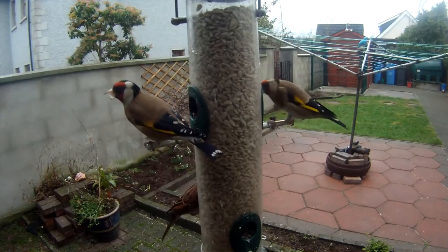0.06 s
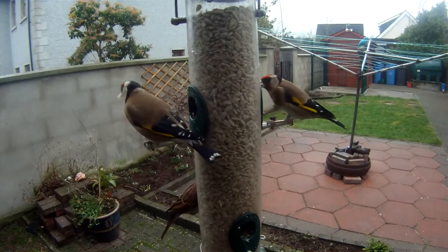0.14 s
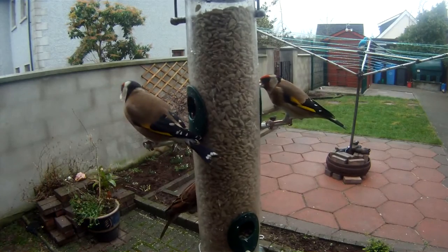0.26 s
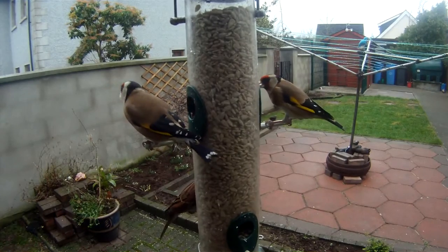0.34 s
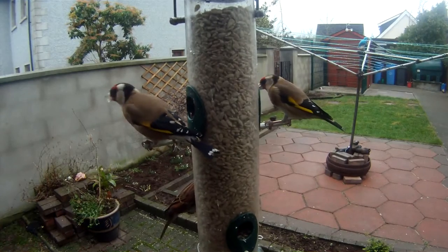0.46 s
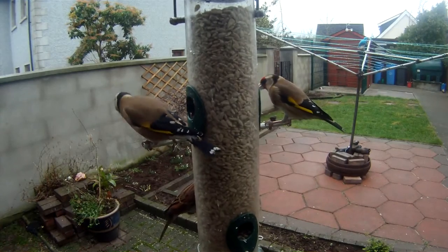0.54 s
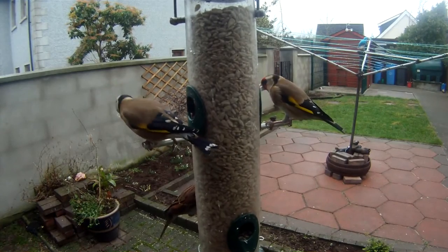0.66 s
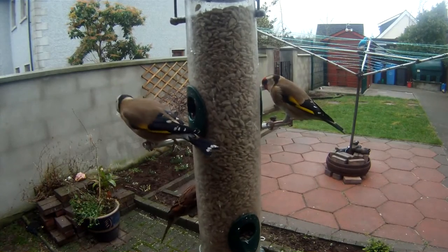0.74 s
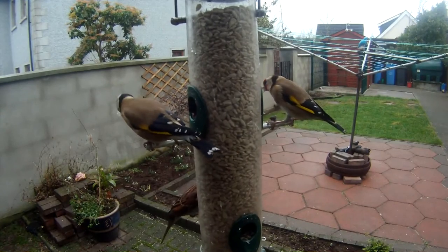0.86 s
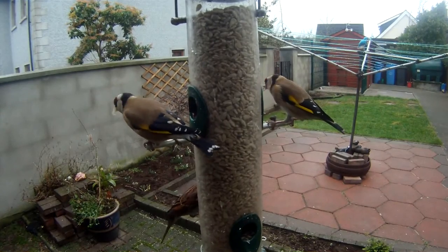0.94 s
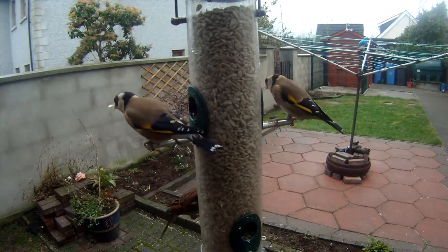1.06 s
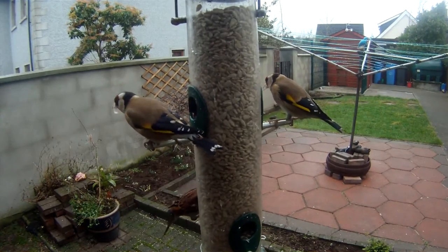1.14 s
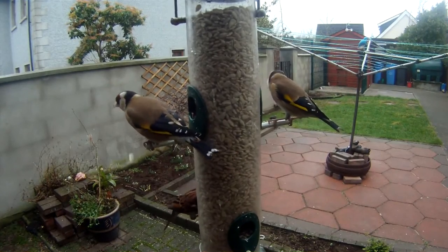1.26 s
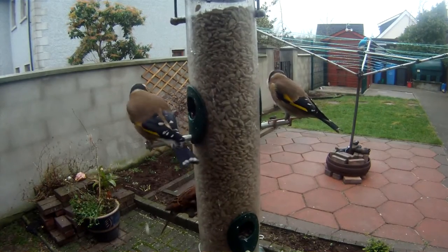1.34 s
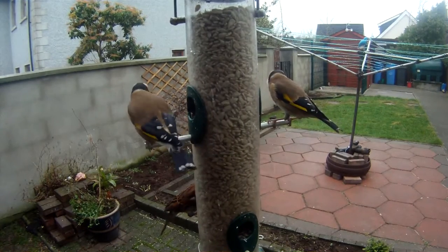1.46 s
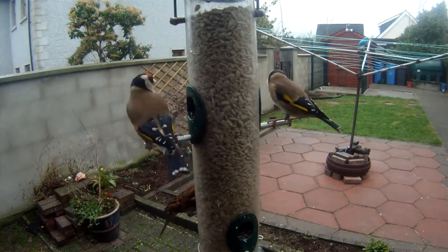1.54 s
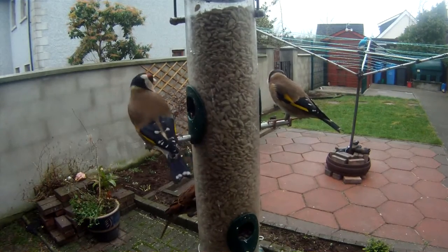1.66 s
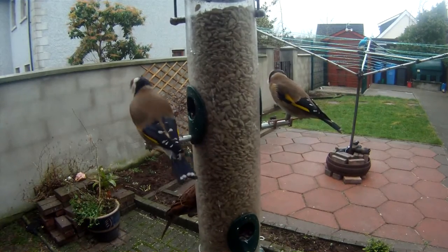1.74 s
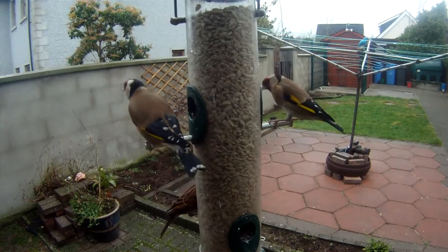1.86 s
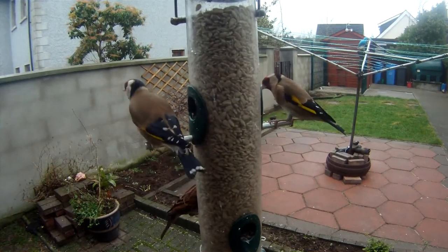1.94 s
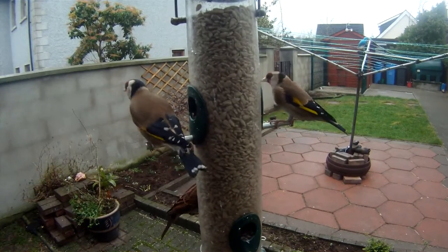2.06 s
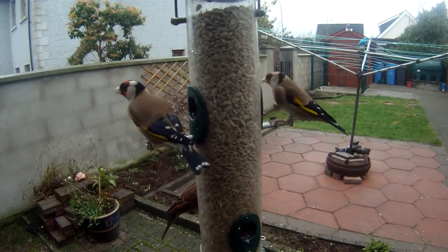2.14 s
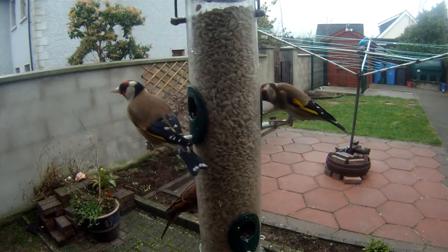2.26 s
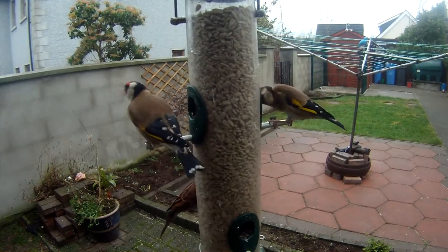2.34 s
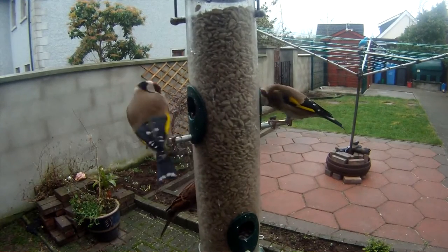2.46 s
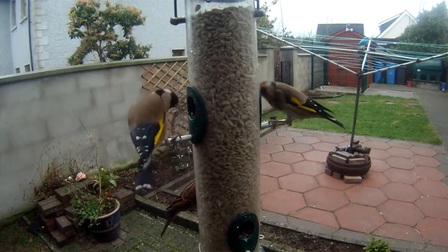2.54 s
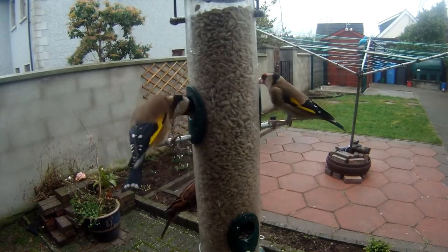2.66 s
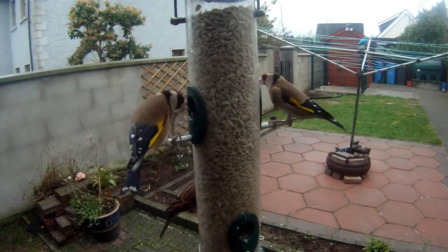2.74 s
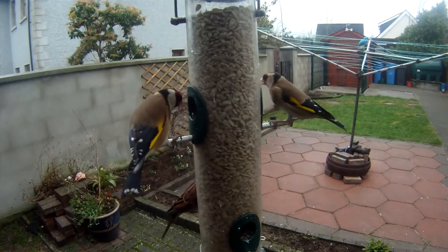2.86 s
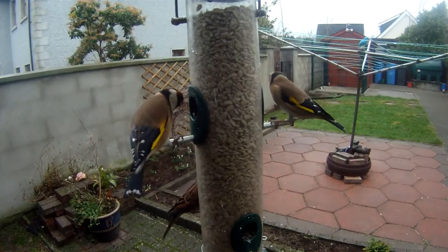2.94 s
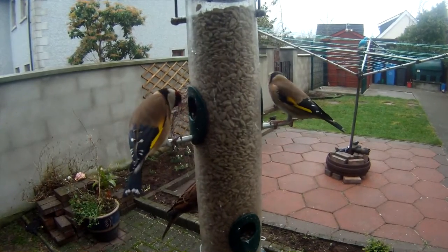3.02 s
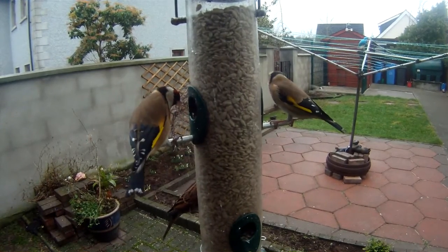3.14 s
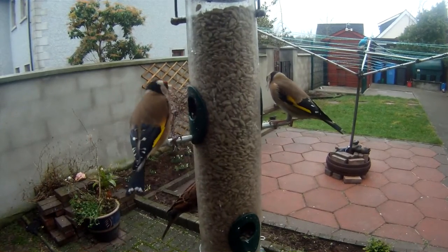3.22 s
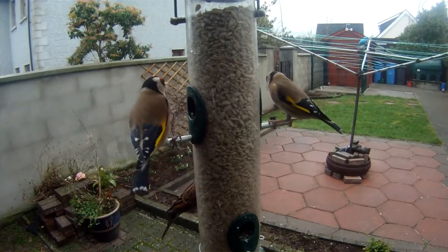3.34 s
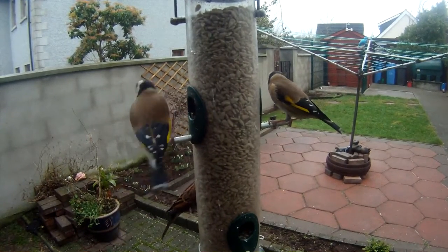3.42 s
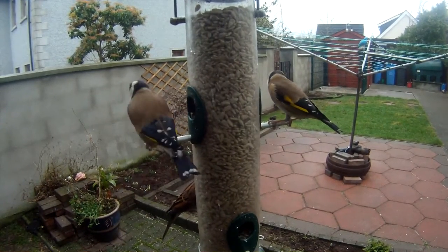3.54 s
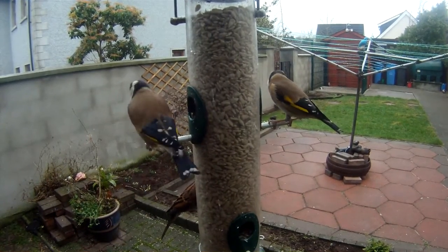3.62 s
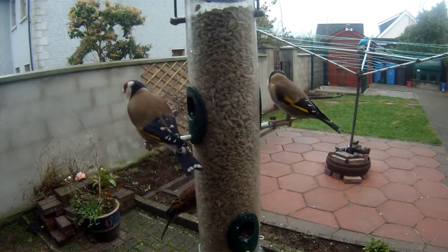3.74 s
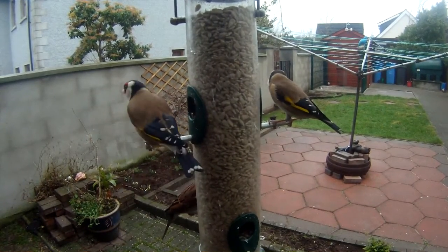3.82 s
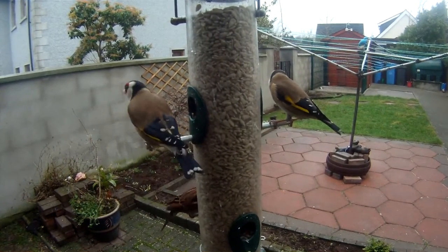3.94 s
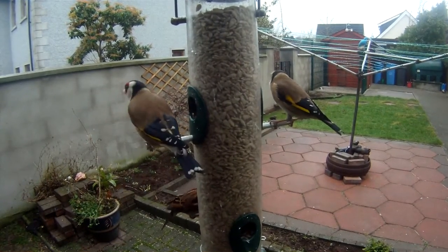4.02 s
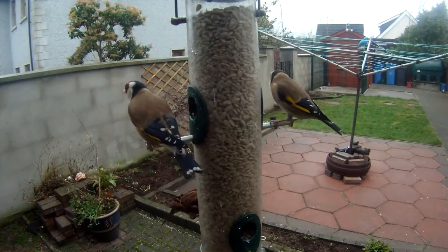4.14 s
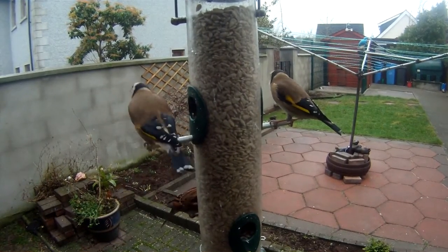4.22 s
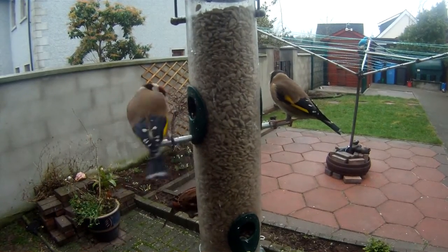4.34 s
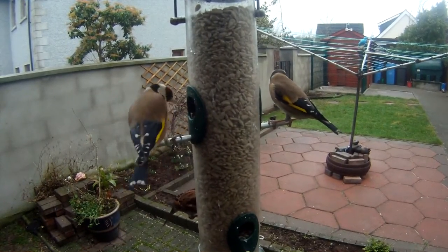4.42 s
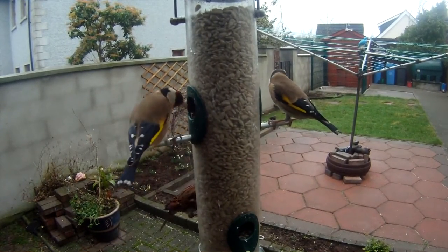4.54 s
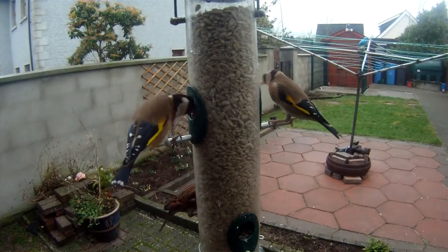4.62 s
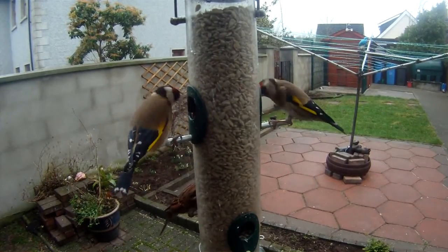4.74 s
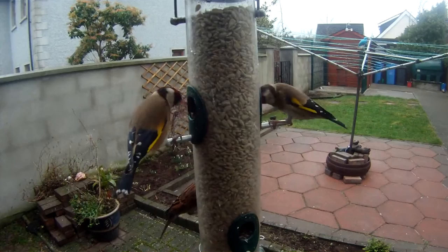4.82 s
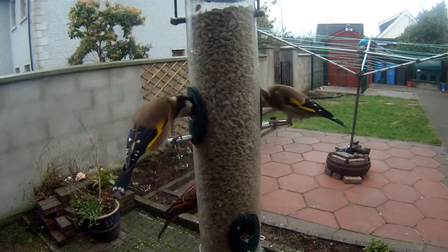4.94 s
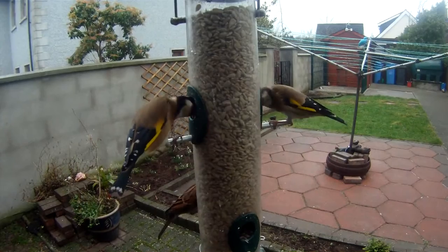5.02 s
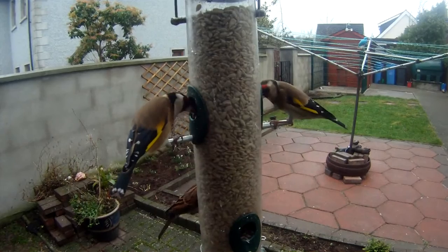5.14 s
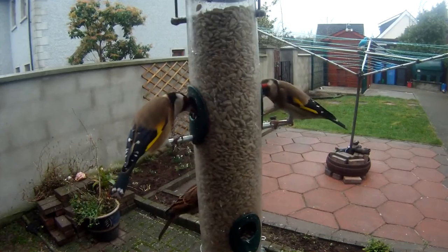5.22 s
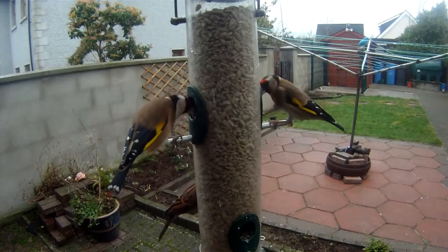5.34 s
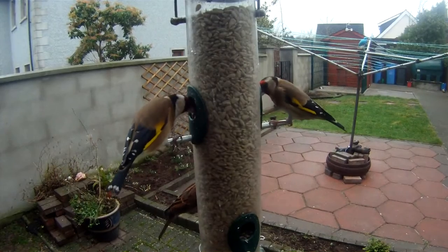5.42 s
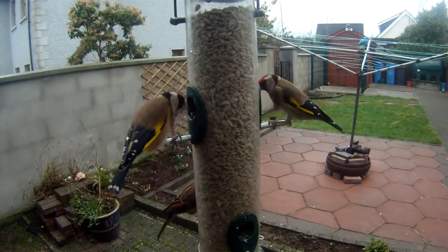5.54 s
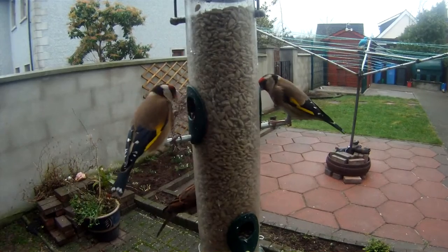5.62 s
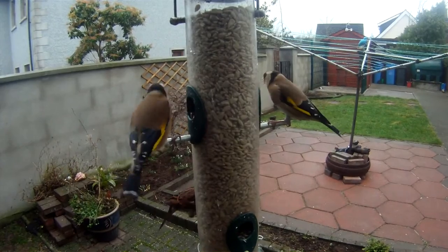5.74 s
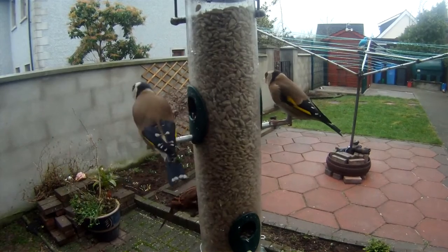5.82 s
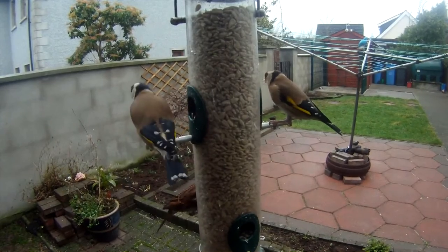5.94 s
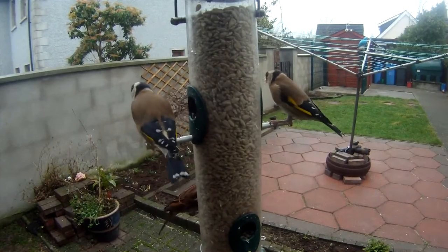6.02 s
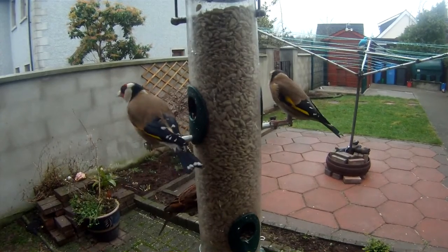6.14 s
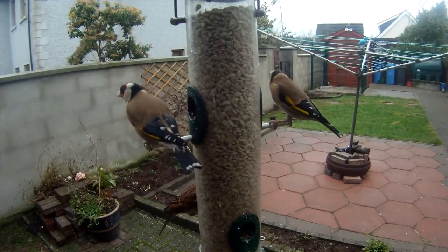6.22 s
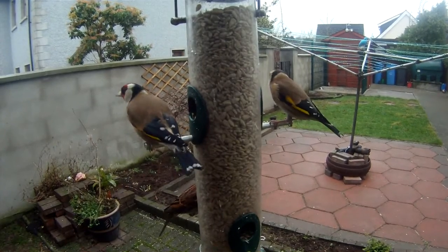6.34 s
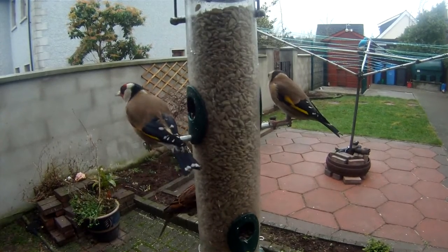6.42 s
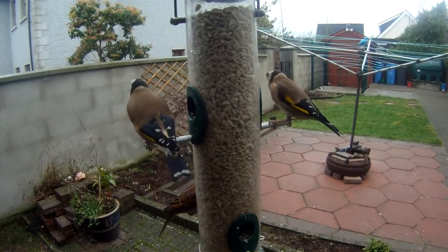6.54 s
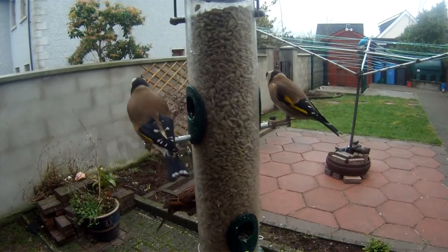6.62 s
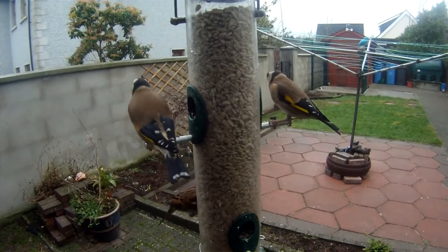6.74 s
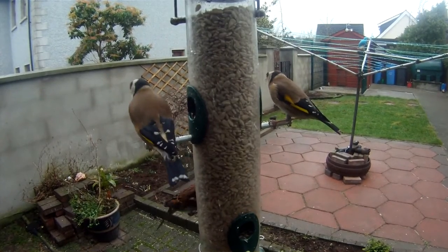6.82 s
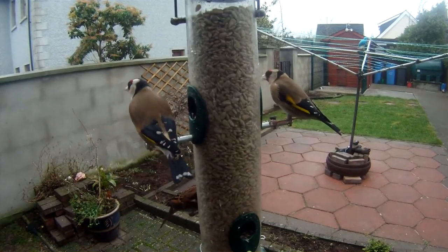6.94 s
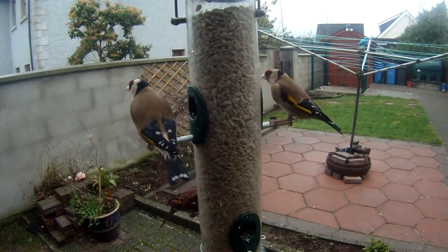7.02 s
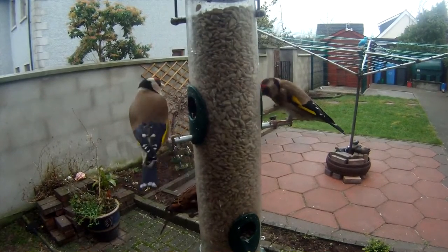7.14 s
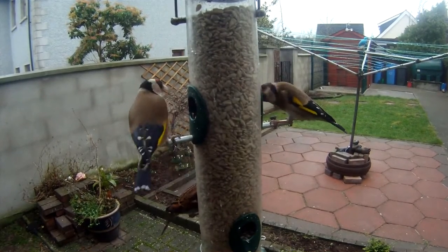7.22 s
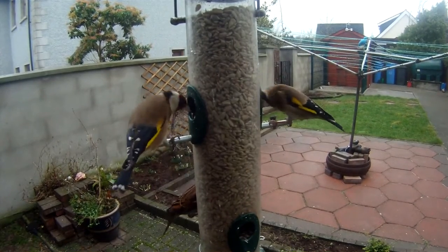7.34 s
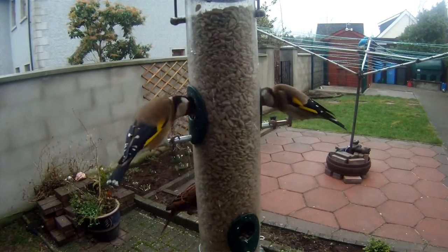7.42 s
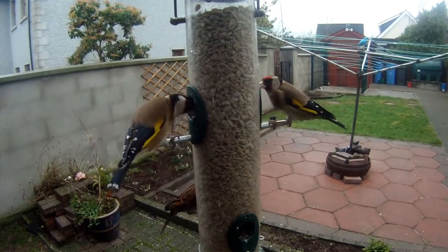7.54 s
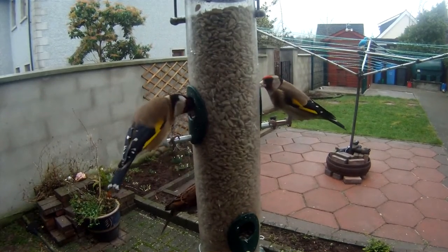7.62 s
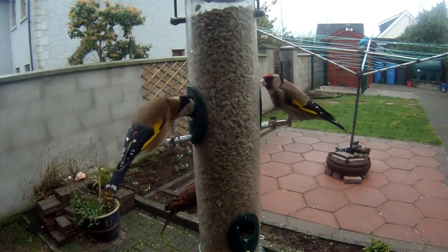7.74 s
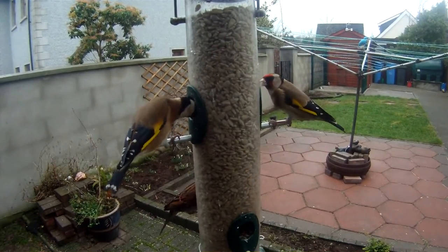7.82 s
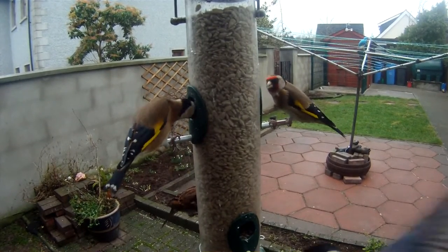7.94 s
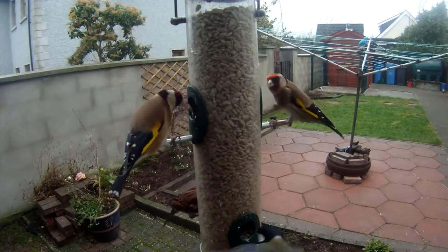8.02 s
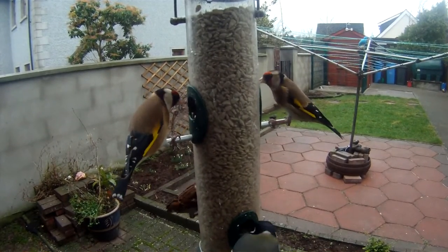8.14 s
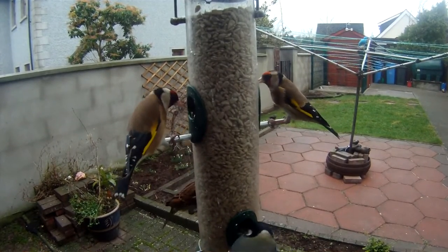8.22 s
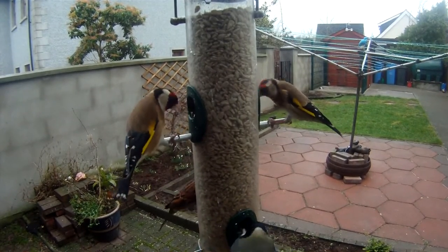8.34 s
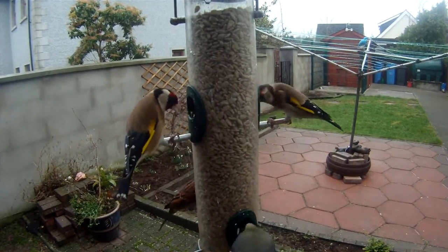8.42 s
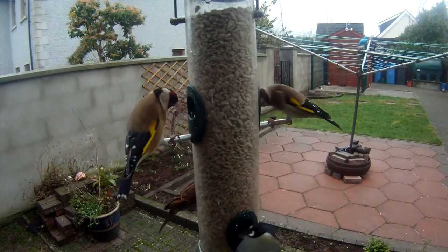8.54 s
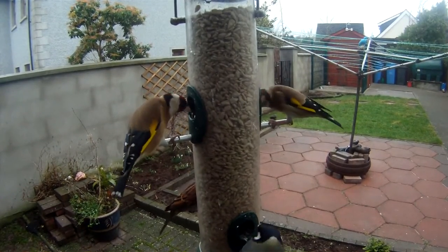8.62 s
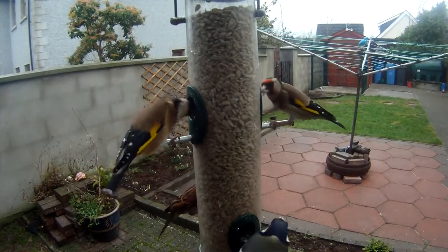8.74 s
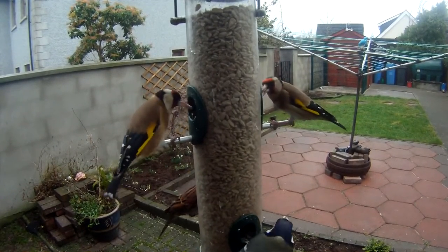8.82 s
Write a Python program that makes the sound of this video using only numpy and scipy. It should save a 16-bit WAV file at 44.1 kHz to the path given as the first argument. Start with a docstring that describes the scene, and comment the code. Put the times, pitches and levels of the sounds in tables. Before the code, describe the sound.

Close, irregular pecks click on a plastic feeder tube in a quiet garden, with soft wing puffs, light bird chips and one landing thump.

```python
"""Goldfinches feed at a plastic seed tube in a quiet garden, close to a small mono camera.
Over a distant town hum, a husk snaps, a far songbird whistles and other birds chip and call.
From 2 s, wings push air at the microphone, claws shuffle and pecks ring the tube, busiest near 7 s.
At 8 s a bird lands: the metal perch pings and the mount thumps. A last few pecks follow.
Throughout, the camera's coarse sampling adds a glassy top."""
import sys
import numpy as np
from scipy import signal
from scipy.fft import rfft, irfft
from scipy.io import wavfile
from scipy.ndimage import uniform_filter1d

SR = 44100
rng = np.random.default_rng(int(sys.argv[2]) if len(sys.argv) > 2 else 0)


def put_to_file(sound):
    """Save the sound as 16-bit audio at rate SR, in the file named by the first command-line argument."""
    columns = np.atleast_2d(sound).T  # one column per channel
    safe = np.clip(columns, -1, 1)
    whole_steps = np.round(safe * 32767)
    wavfile.write(sys.argv[1], SR, whole_steps.astype(np.int16))


N = 391163
TIME_S = np.arange(N) / SR

# Town hum and electronic hiss. Each row: frequency in Hz, relative spectral density in dB.
TOWN_SPECTRUM = [(20, 0.5), (45, 3.5), (90, 3), (170, -3), (350, -4.5), (550, -2), (800, -9.5),
                 (1400, -14.5), (2100, -17.5), (2500, -20), (3200, -23.5), (4000, -25.5), (5200, -27),
                 (6000, -36.5)]
HISS_SPECTRUM = [(100, -21), (200, -15), (900, -12), (3000, -1.5), (5300, 0), (6000, -12.5)]
# Wing beats and gusts. Each row: centre in seconds, half length in seconds, level in dB.
WAFTS = [(2.11, .057, -46.5), (2.7, 0.17, -56), (4.31, .074, -49.5), (5.45, 0.66, -58.5),
         (6.645, 0.048, -40.5), (7.25, .082, -42), (7.68, .054, -45.5), (8.04, 0.0077, -20),
         (8.1, 0.11, -43)]
# Claws and husks scraping. Each row: centre in seconds, half length in seconds, level in dB.
SHUFFLES = [(2.1, 0.068, -66), (4.315, 0.026, -60), (4.51, .045, -61.5), (5.2, 0.081, -62.5),
            (5.84, 0.015, -54), (7.26, 0.03, -62), (6.74, .02, -55), (7.905, 0.033, -56), (8.56, .03, -68)]
# Husks cracking in a beak. Each row: start in seconds, relative level in dB.
HUSK_SNAPS = [(0.162, -60), (2.045, -57), (3.233, -58), (3.601, -60), (4.307, -57), (6.687, -41),
              (6.853, -47.5), (7.198, -55), (7.719, -57.5)]
# Modes of a husk or claw crack, then of the feeder's tube, wall and port.
# Each row: frequency in Hz, bandwidth in Hz, relative gain in dB.
CRACK_MODES = [(1370, 240, -11), (2400, 1600, 1.5), (3270, 520, 9), (4980, 250, 3.5)]
TUBE_MODES = [(326, 63, -6.5), (485, 68, 5.5), (570, 130, 0.5), (790, 40, -16.5)]
WALL_MODES = [(986, 173, -1), (1288, 55, 0.5), (1462, 43, -4), (1665, 140, -3), (1930, 99, 3),
              (2190, 154, -0.5)]
PORT_MODES = [(2830, 240, 9.5), (3187, 160, 14), (3850, 160, 0.5), (4200, 220, -6), (5080, 480, -5.5)]
# Far song. Each row: start in seconds, end in seconds, relative level in dB.
SONG_PHRASES = [(0.173, .86, -66), (4.079, 5.04, -61.5), (8.154, 8.83, -64)]
# Pecks, levels relative. Each row: start in seconds, wall clack in dB, favoured wall pitch in Hz,
# tube thud in dB, port tick in dB, bounce delay in seconds.
PECKS = [(0.272, -59, 2110, -74, -54.5, 0.00206), (2.643, -22.5, 1860, -35.5, -23.5, 0.0071),
         (2.756, -43.5, 1500, -48, -33.5, 0.0021), (2.870, -46.5, 1770, -51, -48, 0.0027),
         (2.897, -43, 1880, -49, -42.5, 0.0018), (4.529, -55, 2100, -62, -38, .002),
         (4.545, -34, 2080, -38.5, -32, 0.0051), (5.254, -32.5, 2170, -50, -28, 0.0091),
         (5.283, -37, 1610, -39, -35, .012), (5.317, -44, 2110, -60, -43.5, 0.0058),
         (6.165, -53.5, 1900, -66, -71, .002), (6.659, -30, 1930, -36.5, -39, 0.0028),
         (6.683, -24.5, 1750, -30, -26.5, 0.0063), (6.711, -33, 1840, -41.5, -34, 0.0048),
         (6.748, -39.5, 1880, -54, -45, 0.0084), (6.847, -22, 1660, -31.5, -28, .009),
         (7.016, -43, 1830, -44.5, -38, .01), (7.041, -45, 1900, -59, -45, 0.0032),
         (7.0674, -20, 1910, -38, -27.5, .011), (7.318, -30, 1480, -39.5, -29, 0.0031),
         (7.371, -49, 1890, -67, -51, 0.0058), (7.559, -36, 1940, -46, -42.5, .002),
         (7.858, -48.5, 1900, -62, -49, .002), (7.881, -40, 1850, -55, -39, 0.0095),
         (7.907, -41, 1860, -58, -54, 0.012), (7.987, -41.5, 1780, -62, -35.5, .002),
         (8.542, -44, 1380, -47.5, -51, 0.0046), (8.586, -39.5, 1840, -58, -42, .002)]
# Contact chips. Each row: start in seconds, middle pitch in Hz, relative level in dB.
CHIPS = [(.444, 3310, -48), (.514, 3440, -47.5), (0.607, 3210, -45), (1.498, 3330, -50.5),
         (2.133, 3010, -45.5), (2.57, 3050, -45.5), (2.659, 3040, -48), (3.114, 3170, -48.5),
         (3.197, 3370, -50.5), (3.738, 3330, -50), (3.829, 3480, -49), (4.826, 3360, -48.5),
         (5.592, 2930, -52), (8.259, 2980, -48)]
# Finch calls, near and far. Each row: start in seconds, relative level in dB.
FINCH_CALLS = [(1.285, -61), (2.669, -45), (7.02, -45)]
# Notes of one call. Each row: delay in seconds, length in seconds, first, middle and last pitch in Hz,
# relative level in dB.
CALL_NOTES = [(0, 0.059, 4250, 4970, 5350, -8.5), (0.042, 0.048, 4290, 4280, 4060, 1),
              (0.083, .035, 4150, 3560, 3100, -4.5)]
# Mount and metal perch. Each row: frequency in Hz, level in dB, time to fall 60 dB in seconds.
MOUNT_MODES = [(41.8, -13, 0.14), (69, -11, 0.099), (241, -24.5, 0.053), (407, -44, 0.072),
               (4860, -29, 0.011)]
# Air pressure on the microphone. Each row: frequency in Hz, relative spectral density in dB.
WAFT_SPECTRUM = [(12, -26), (25, 4.5), (50, 7.0), (100, -10.5), (200, -17), (500, -36.0), (2000, -44)]


def from_db(db):
    """Decibels to gain."""
    return 10 ** (np.asarray(db) / 20)


def unit_rms(x):
    """Scale to rms 1."""
    return x / np.sqrt(np.mean(x ** 2) + 1e-20)


def add(track, start_s, sound):
    """Mix a sound into a track."""
    start = max(0, round(start_s * SR))
    track[start:start + len(sound)] += sound[:N - start]


def noise(spectrum):
    """Steady coloured noise, rms 1."""
    hz, db = np.transpose(spectrum)
    bins_hz = np.maximum(np.fft.rfftfreq(N, 1 / SR), 1)
    colour = from_db(np.interp(np.log(bins_hz), np.log(hz), db)) * bins_hz / np.hypot(bins_hz, 10)
    return unit_rms(irfft(rfft(rng.standard_normal(N)) * colour, N))


def swells(rows):
    """Gain curve: one Gaussian bump per row."""
    return sum(from_db(db) * np.exp(-((TIME_S - centre_s) / half_s) ** 2) for centre_s, half_s, db in rows)


def resonate(force, modes):
    """Parallel resonances, alternating in sign."""
    out = 0
    for k, (hz, width_hz, db) in enumerate(modes):
        r = np.exp(-np.pi * width_hz / SR)
        poles = [1, -2 * r * np.cos(2 * np.pi * hz / SR), r * r]
        out = out + (-1) ** k * from_db(db) * (1 - r * r) / 2 * signal.lfilter([1, 0, -1], poles, force)
    return out


def strike(modes, contact_s, top_hz):
    """A gritty contact rings modes at random strengths; seed rattles on briefly. Peak 3 ms rms is 1."""
    t = TIME_S[:4096]
    attack = np.minimum(4.8 * t / contact_s, 1)
    decay = np.exp(-t / (1.9 * contact_s))
    rattle = 0.013 * np.exp(-t / 0.032)
    force = rng.standard_normal(len(t)) * attack * (decay + rattle)
    ring = resonate(force, [(hz, width_hz, db + rng.normal(0, 2.24)) for hz, width_hz, db in modes])
    band_hz = [0.71 * modes[0][0], top_hz]
    ring = signal.sosfilt(signal.butter(3, band_hz, "band", fs=SR, output="sos"), ring)
    return ring / np.sqrt(uniform_filter1d(ring ** 2, 130).max())


def whistles(notes, wobble):
    """Unsteady sine glides. Each note: start and length in seconds, three pitches in Hz, level in dB."""
    out = np.zeros(N)
    for start_s, length_s, pitches_hz, db in notes:
        progress = np.linspace(0, 1, int(length_s * SR))
        glide_hz = np.polyval(np.polyfit([0, 0.5, 1], pitches_hz, 2), progress)
        jitter = unit_rms(uniform_filter1d(rng.standard_normal(SR // 4), size=60))[:len(progress)]
        phase = 2 * np.pi * np.cumsum(glide_hz * (1 + wobble * jitter)) / SR
        envelope = np.abs(np.sin(np.pi * progress)) ** 0.74
        add(out, start_s, from_db(db) * envelope * np.sin(phase))
    return out


def town_hum(level_db):
    """Distant town and air: steady low noise."""
    return from_db(level_db) * noise(TOWN_SPECTRUM)


def hiss(level_db):
    """Electronic noise, independent per channel."""
    return from_db(level_db) * np.array([noise(HISS_SPECTRUM), noise(HISS_SPECTRUM)])


def breeze_and_wings(breeze_db):
    """A light breeze, gusts and wings press on the microphone port: a lumpy rumble."""
    return (swells(WAFTS) + from_db(breeze_db)) * noise(WAFT_SPECTRUM)


def scraping(slips_per_s, wall_db, nibble_db, trickle_db, delay_s=0.018, half_s=0.015):
    """Tiny slips ring the plastic: steady nibbling, shuffling claws, a seed trickle after each peck."""
    slips = (rng.random(N) < slips_per_s / SR) * rng.standard_normal(N) + 1e-18
    scrape = unit_rms(resonate(slips, PORT_MODES) + from_db(wall_db) * resonate(slips, WALL_MODES))
    trickles = [(peck_s + delay_s, half_s, tick_db + trickle_db) for peck_s, *_, tick_db, _ in PECKS]
    return scrape * (swells(SHUFFLES + trickles) + from_db(nibble_db))


def husk_snaps(gain_db):
    """Husks crack in a beak: small dry snaps."""
    out = np.zeros(N)
    for start_s, db in HUSK_SNAPS:
        add(out, start_s, from_db(db + gain_db) * strike(CRACK_MODES, contact_s=0.0011, top_hz=5460))
    return out


def far_song(pitches_hz, length_s, period_s, detune):
    """A far songbird repeats one sagging whistle in phrases, each note slightly detuned."""
    notes = [(start_s, length_s, np.array(pitches_hz) * rng.normal(1, detune), db)
             for from_s, until_s, db in SONG_PHRASES for start_s in np.arange(from_s, until_s, period_s)]
    return whistles(notes, wobble=0.015)


def garden_echoes(direct, echo_db, t60_s, count=40):
    """Direct sound plus scattered echoes from walls and paving."""
    echoes = np.zeros(N)
    for delay_s in np.linspace(0.008, 0.2, count) + rng.uniform(-0.0015, 0.002053, count):
        add(echoes, delay_s, direct * from_db(echo_db - 60 * delay_s / t60_s) * rng.choice([-1, 1]))
    return direct + echoes


def pecks(wall_db, tube_db, port_db, focus_db_per_octave, contact_s=0.0017):
    """A beak hits, then bounces, duller and deeper. The spot it hits favours some wall modes."""
    out = np.zeros(N)
    for start_s, clack_db, pitch_hz, thud_db, tick_db, bounce_s in PECKS:
        gains = from_db([clack_db + wall_db, thud_db + tube_db, tick_db + port_db])
        touch = (start_s, pitch_hz, gains)
        bounce = (start_s + bounce_s, 0.94 * pitch_hz, gains * from_db([-1, 2.5, -6]))
        for hit_s, favoured_hz, (wall_gain, tube_gain, port_gain) in (touch, bounce):
            wall_modes = [(hz, width_hz, db - focus_db_per_octave * abs(np.log2(hz / favoured_hz)))
                          for hz, width_hz, db in WALL_MODES]
            add(out, hit_s - 0.0004, port_gain * strike(PORT_MODES, contact_s, top_hz=4180))
            add(out, hit_s - 0.0004, wall_gain * strike(wall_modes, contact_s, top_hz=2350))
            add(out, hit_s + 0.00075, tube_gain * strike(TUBE_MODES, contact_s, top_hz=1070))
    return out


def twitter(relative_db, count):
    """Very distant birds: short notes at random times and pitches."""
    notes = []
    for when, length, height, bend in rng.random((count, 4)):
        pitches_hz = np.array([4200, 4000, 3500 + 600 * bend]) + 1000 * height
        notes.append((when * N / SR, 0.033 + 0.0425 * length, pitches_hz, relative_db))
    return whistles(notes, wobble=0.015)


def chips(base_s, base_hz):
    """Short falling contact notes; deeper ones last longer."""
    notes = [(start_s, base_s * (base_hz / hz) ** 1.8, (1.17 * hz, hz, 0.854 * hz), db)
             for start_s, hz, db in CHIPS]
    return whistles(notes, wobble=0.029)


def finch_calls():
    """Three whistled notes per call: rise, hold, drop."""
    notes = [(start_s + delay_s, length_s, pitches_hz, call_db + note_db)
             for start_s, call_db in FINCH_CALLS for delay_s, length_s, *pitches_hz, note_db in CALL_NOTES]
    return whistles(notes, wobble=0.037)


def landing(start_s, crack_db):
    """Claws crack on the perch, which pings; the mount swings for a few cycles."""
    out, t = np.zeros(N), TIME_S[:SR // 2]
    for hz, db, t60_s in MOUNT_MODES:
        add(out, start_s, from_db(db - 60 * t / t60_s) * np.sin(2 * np.pi * hz * t))
    add(out, start_s, from_db(crack_db) * strike(CRACK_MODES, contact_s=0.00071, top_hz=6450))
    return out


def scene():
    """One microphone feeds both channels; only the bird voices echo."""
    background = town_hum(level_db=-53)
    feeder = pecks(wall_db=-4, tube_db=-3.5, port_db=-5.5, focus_db_per_octave=18.5)
    feeder += landing(start_s=8.0365, crack_db=-26)
    feeder += husk_snaps(gain_db=1)
    feeder += scraping(slips_per_s=1800, wall_db=11, nibble_db=-73.5, trickle_db=-27)
    rumble = breeze_and_wings(breeze_db=-72.5)
    voices = far_song(pitches_hz=(5370, 5170, 4750), length_s=0.09, period_s=0.272, detune=0.012)
    voices += twitter(relative_db=-70, count=22) + chips(base_s=0.0201, base_hz=3320) + finch_calls()
    birds = garden_echoes(from_db(-6) * voices, echo_db=-10.5, t60_s=0.3)
    return background + feeder + rumble + birds + hiss(level_db=-76.5)


def record(dry, camera_hz=12000, cutoff_hz=15400):
    """The camera's slow sample-and-hold mirrors the sound into the treble; a low-pass cuts the top."""
    coarse = signal.resample_poly(dry, camera_hz, SR, axis=1)
    held = signal.resample_poly(np.repeat(coarse, 4, axis=1), SR, 4 * camera_hz, axis=1)[:, :N]
    return signal.sosfilt(signal.ellip(10, 0.2, 80, cutoff_hz, fs=SR, output="sos"), held)


dry = scene()
out = record(dry)
put_to_file(out)
```